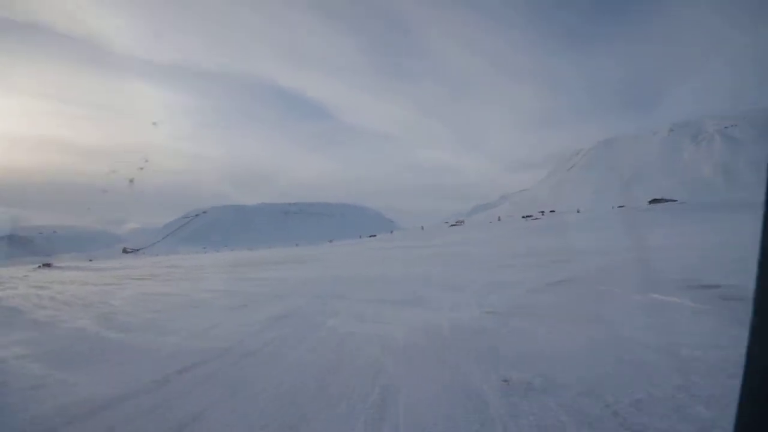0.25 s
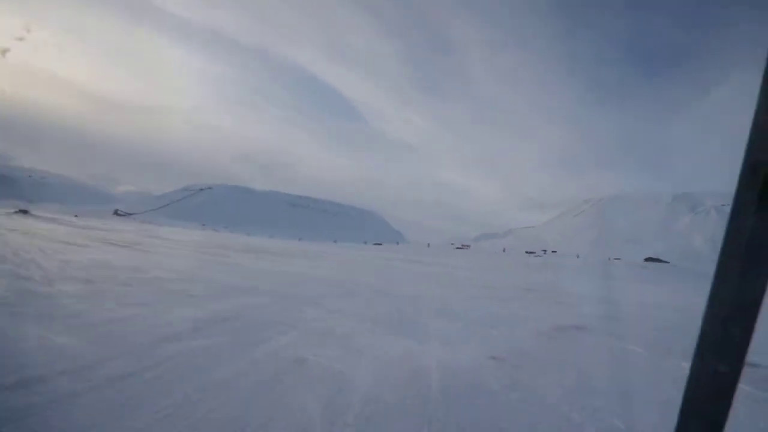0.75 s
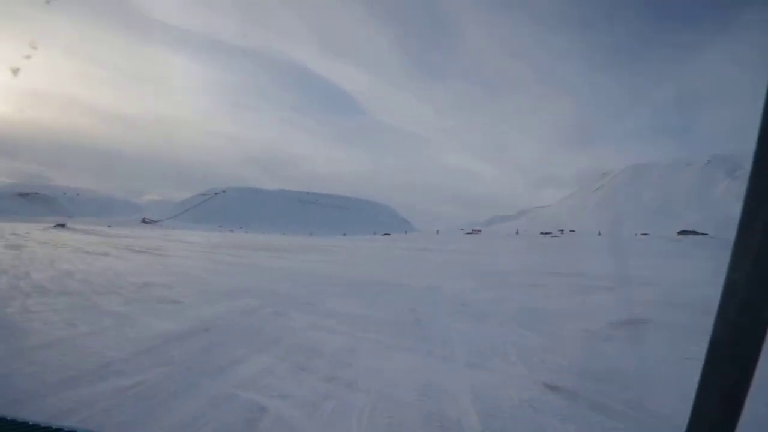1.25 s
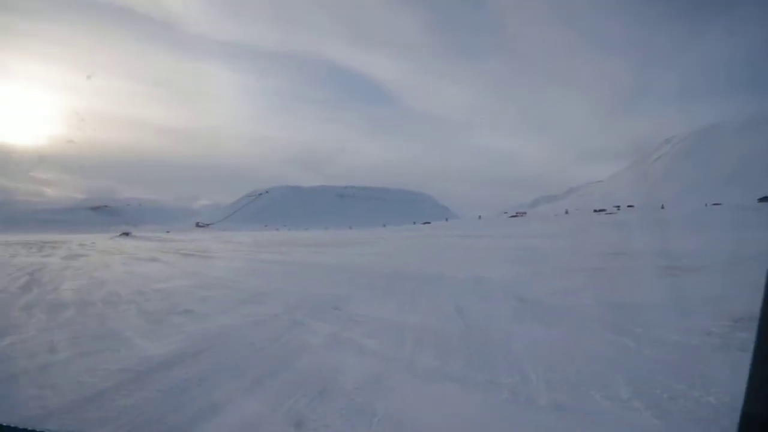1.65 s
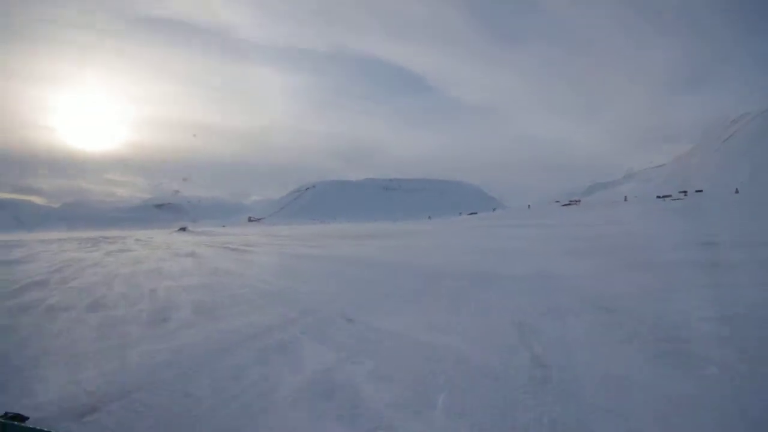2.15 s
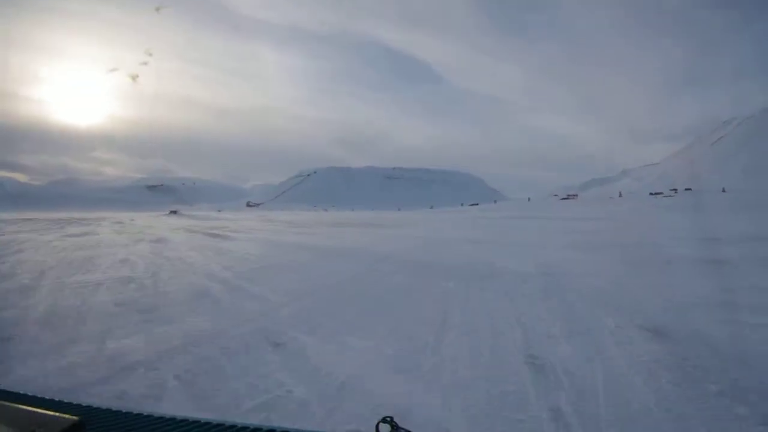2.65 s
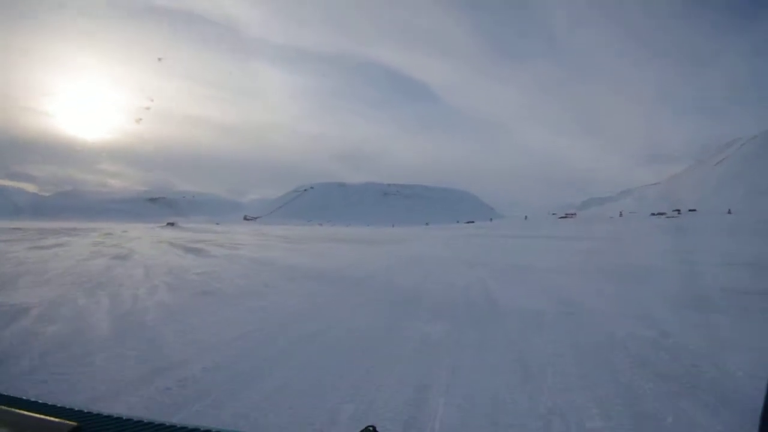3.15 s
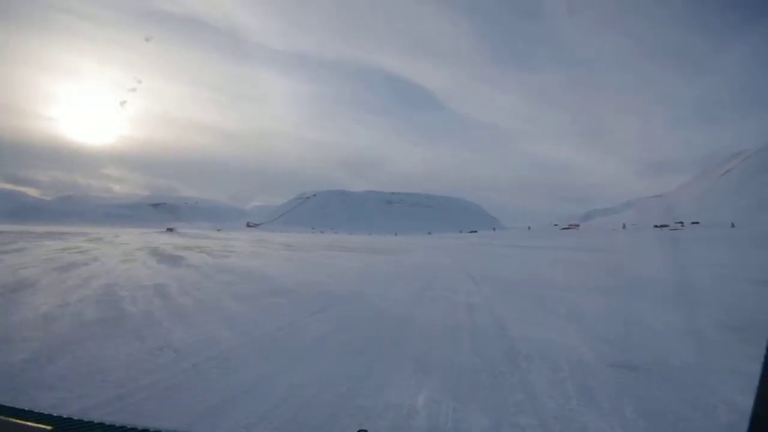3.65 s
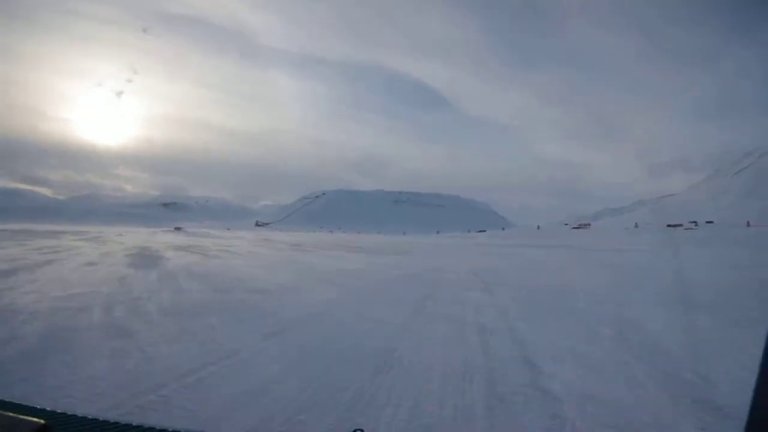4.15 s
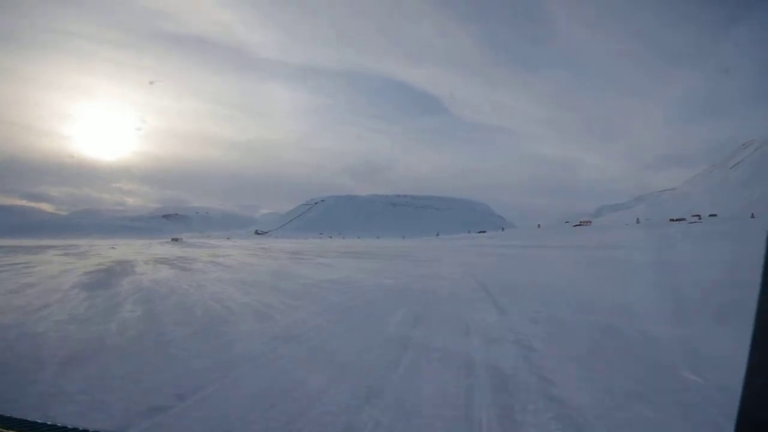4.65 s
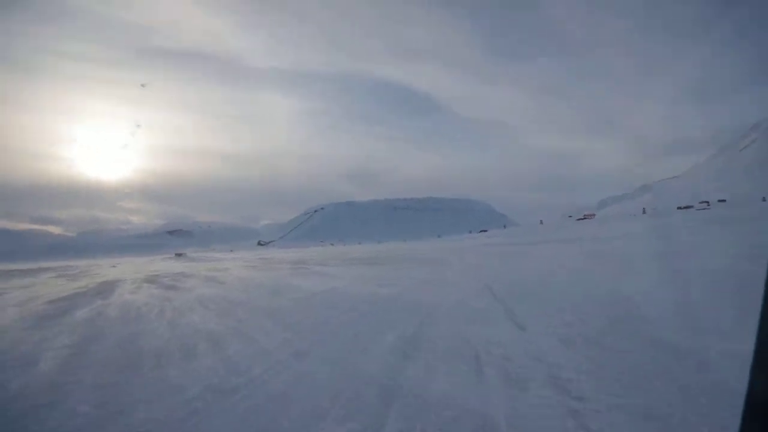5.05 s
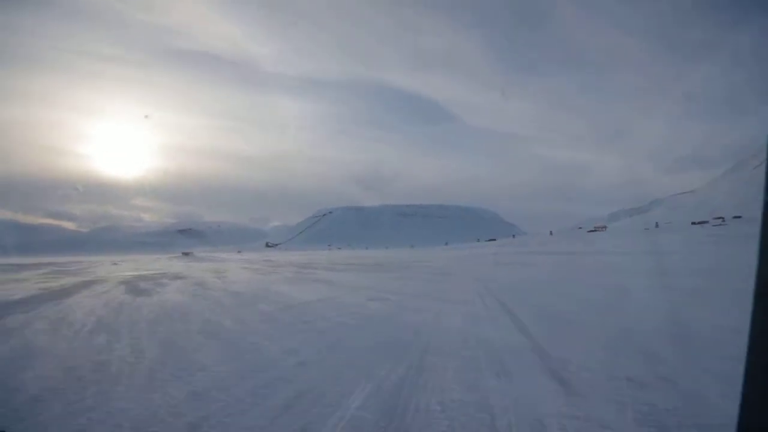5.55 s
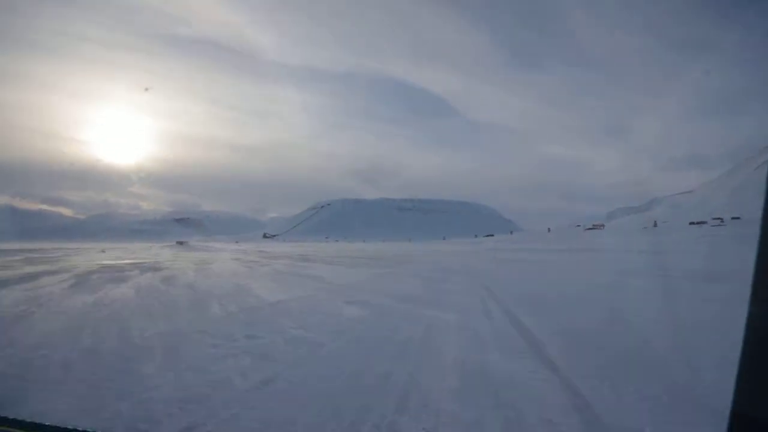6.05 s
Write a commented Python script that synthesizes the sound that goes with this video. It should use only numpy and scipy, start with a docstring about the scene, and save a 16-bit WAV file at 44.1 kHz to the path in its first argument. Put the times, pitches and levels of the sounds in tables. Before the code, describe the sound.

Heard from inside the cab, a tracked vehicle cruises over snow, its engine droning with a strong humming tone above rumbling, grinding tracks. Bumps swell the drone and bring dull thuds, hardest in the first half. The engine rises slightly in pitch, then eases back. Small ticks, pops and tiny squeaks run throughout, with faint puffs of hissing snow and a trace of jingling metal.

```python
"""Inside the cab of a tracked over-snow vehicle at cruise. From the start the engine hums, its ninth
cycle order booming, over rumbling tracks; ticks, pops and tiny squeaks run throughout, and the level dips
briefly at each tick or pop. At bumps the drone swells and the hull thuds, hardest from 1.2 to 3 s.
The engine speeds up slightly until 3 s, then eases back. Puffs of snow hiss against the cab, strongest
from 4.4 to 5.5 s, and loose metal jingles faintly with them."""
import sys
import numpy as np
from scipy import signal
from scipy.fft import rfft, irfft
from scipy.io import wavfile
from scipy.ndimage import uniform_filter1d

SR = 44100
rng = np.random.default_rng(int(sys.argv[2]) if len(sys.argv) > 2 else 0)


def transcribe(signal):
    """Save signal, clipped to [-1, 1], as a 16-bit WAV file at the path in sys.argv[1]."""
    frames = np.atleast_2d(signal).T
    limited = np.clip(frames, -1, 1)
    pcm = np.round(limited * 32767).astype(np.int16)
    wavfile.write(sys.argv[1], SR, pcm)


N = 277406
TIME = np.arange(N) / SR


def amp(db):
    """Decibels to gain."""
    return 10 ** (np.asarray(db) / 20)


def unit(x):
    """Scales to rms 1."""
    return x / np.sqrt(np.mean(x ** 2) + 1e-20)


def curve(table):
    """Breakpoints to one value a sample."""
    return np.interp(TIME, *np.transpose(table))


def add(mix, s, sound):
    """Mixes a sound in at time s."""
    part = mix[max(round(s * SR), 0):][:len(sound)]
    part += sound[:len(part)]


def noise(spectrum):
    """Shaped noise, rms 1."""
    hz, db = np.transpose(spectrum)
    gain = amp(np.interp(np.log(np.fft.rfftfreq(N, 1 / SR) + 1), np.log(hz), db))
    return unit(irfft(rfft(rng.standard_normal(N)) * gain, N))


def wander(rate_hz):
    """Smooth random motion up to rate_hz, rms 1."""
    hz = np.fft.rfftfreq(N, 1 / SR)
    return unit(irfft(rfft(rng.standard_normal(N)) / (1 + (hz / rate_hz) ** 4), N))


def hump(s, before_s, after_s):
    """Two-sided Gaussian swell at time s, height 1."""
    return np.exp(-((TIME - s) / np.where(TIME < s, before_s, after_s)) ** 2 / 2)


# Modes of small loose metal: f/Hz, relative level/dB, t60/s
METAL_MODES = [(11000, -7, .06), (11650, -7, .06), (12590, -3, .05), (13306, 4, .06), (14199, -11, .06),
               (14750, -7, .05), (15270, 9, .07), (15636, 11, 0.079)]

def jingle(gust_db, level_db=-9, spread_db=3, touches_per_s=100):
    """Random touches ring the metal's modes, harder in each gust."""
    t, out = np.arange(SR // 5) / SR, np.zeros(N)
    touching = rng.random(N) < touches_per_s / SR
    touches = touching * amp(gust_db + spread_db * rng.standard_normal(N))
    for hz, db, t60_s in METAL_MODES:
        ring = amp(db - 60 * t / t60_s) * np.sin(2 * np.pi * hz * t)
        out += signal.oaconvolve(touches * rng.standard_normal(N), ring)[:N]
    return unit(out) * np.sqrt(np.mean(amp(gust_db + level_db) ** 2))


# Snow puffs: peak t/s, relative level/dB, half-length/s
SNOW_PUFFS = [(0.09, -66, 0.016), (0.78, -66, 0.056), (1.783, -56.5, 0.046), (1.896, -57, 0.011),
              (2.01, -61, 0.029), (2.164, -72, 0.016), (2.367, -69, .025), (2.982, -60.5, 0.074),
              (3.264, -58, 0.035), (3.723, -63, .04), (4.376, -55.5, 0.02), (4.616, -51.5, .036),
              (4.915, -56, 0.0075), (5.012, -60, .015), (5.46, -58, 0.02), (5.532, -54, 0.021)]

def gusts(drift_db=-70, sway_db=3.5, sway_hz=5.4):
    """Flying snow in dB: puffs thrown by the tracks over a thin, uneven drift."""
    drift = amp(drift_db + sway_db * wander(sway_hz))
    puff_power = sum((amp(db) * hump(s, half_s, half_s)) ** 2 for s, db, half_s in SNOW_PUFFS)
    return 10 * np.log10(drift ** 2 + puff_power)


# Snow hiss: f/Hz, relative density/dB
SPRAY_SPECTRUM = [(1000, -7), (3000, -9), (6000, -7.5), (9000, -6), (12000, -5), (13800, -1.5), (15200, -1),
                  (16000, -1.5)]

def spray(gust_db, level_db=3.5, flicker_db=3, grit_db=2):
    """Fine snow hisses against the cab in gritty gusts."""
    return noise(SPRAY_SPECTRUM) * amp(gust_db + level_db + flicker_db * wander(37) + grit_db * wander(900))


# Tiny squeaks: t/s, relative peak level/dB, f/Hz
TRIM_SQUEAKS = [(0.1885, -35, 9050), (0.298, -46, 8040), (0.968, -40, 8400), (1.2204, -38, 8000),
                (2.9229, -33.5, 8200), (3.8852, -33, 9350), (3.9746, -40, 7840), (4.3251, -43, 8000),
                (4.7476, -36.5, 8550), (4.8434, -49, 8170), (5.1936, -37, 7900), (6.1444, -37.5, 8100),
                (6.2294, -44, 7540)]

def squeaks(level_db=3, rise_s=0.00013):
    """Chirps of a few cycles, as of dry trim catching."""
    t, out = np.arange(256) / SR, np.zeros(N)
    envelope = t / rise_s * np.exp(1 - t / rise_s)
    for s, db, hz in TRIM_SQUEAKS:
        add(out, s, amp(db + level_db) * envelope * np.sin(2 * np.pi * hz * t))
    return out


# Sharp ticks: t/s, step count
TICK_STAIRS = [(0.066, 5), (0.149, 3), (0.205, 4), (0.276, 4), (0.396, 3), (0.823, 5), (0.861, 3),
               (1.072, 3), (1.274, 4), (1.364, 2), (1.5, 4), (1.639, 5), (1.695, 6), (1.79, 3), (1.89, 3),
               (2.222, 2), (2.317, 3), (2.451, 5), (2.693, 3), (3.042, 4), (3.285, 5), (3.529, 5),
               (3.68, 3), (3.709, 4), (4.044, 6), (4.133, 6), (4.701, 3), (4.758, 4), (4.771, 6),
               (4.938, 4), (5.073, 4), (5.566, 4), (5.679, 4), (5.723, 5), (6.259, 3)]
# Dull pops: t/s, relative total height/dB
POP_STAIRS = [(0.3786, -15), (0.3873, -16), (0.5755, -17), (0.6707, -15), (0.7308, -15), (1.1078, -19),
              (1.1928, -18), (1.2445, -19), (1.4508, -18), (1.5452, -15.5), (1.8202, -17), (1.9874, -16),
              (2.0709, -16), (2.1689, -14), (2.177, -17), (2.2697, -16), (2.4317, -17), (2.782, -17),
              (2.8699, -19), (2.9273, -16), (2.9939, -17), (3.0148, -18), (3.044, -19), (3.1481, -18),
              (3.2185, -19), (3.4449, -17), (3.4826, -16.5), (3.5664, -17), (3.8603, -17), (4.2076, -15.5),
              (4.3375, -18), (4.481, -16), (5.0228, -16), (5.2037, -15), (5.2875, -15), (5.4022, -17),
              (5.8915, -19), (6.104, -16)]

def click_steps(tick_db=-32, tick_step_hz=2475, pop_gain_db=0.8, pop_step_hz=10160, pop_steps=5,
                small_db=-31.5, small_per_s=15, faint_db=-37, faint_per_s=41):
    """One impulse a step: slow stairs for ticks, steep for pops; random short stairs and lone steps."""
    steps = amp(faint_db) * rng.choice([-1, 1], N) * (rng.random(N) < faint_per_s / SR)
    small_times = TIME[rng.random(N) < small_per_s / SR]
    stairs = [(s, rng.choice([2, 2, 3]), tick_step_hz, amp(small_db)) for s in small_times]
    stairs += [(s, count, tick_step_hz, amp(tick_db)) for s, count in TICK_STAIRS]
    stairs += [(s, pop_steps, pop_step_hz, amp(db + pop_gain_db) / pop_steps) for s, db in POP_STAIRS]
    for s, count, step_hz, height in stairs:
        sign = rng.choice([-1, 1])
        for k in range(count):
            add(steps, s + k / step_hz, [sign * height])
    return steps


def ticks(steps, sag_hz=150, soften_hz=9500):
    """Each step is a sharp click that sags back; quick runs make ticks and pops."""
    jumps = signal.sosfilt(signal.butter(2, sag_hz, "high", fs=SR, output="sos"), np.cumsum(steps))
    return signal.sosfilt(signal.butter(2, soften_hz, fs=SR, output="sos"), jumps)


def dips(steps, dip_db=0.6364, full_step=0.032, recover_s=0.1, trend_s=0.19):
    """Gain that falls a little at each step and creeps back, centred on its local mean."""
    falls_db = dip_db * np.minimum(abs(steps) / full_step, 1)
    sunk_db = signal.lfilter([1], [1, -np.exp(-1 / (recover_s * SR))], falls_db)
    return amp(uniform_filter1d(sunk_db, int(trend_s * SR)) - sunk_db)


# Bumps: peak t/s, swell/dB, rise/s, thud level/dB, lull depth/dB (negative lifts)
BUMPS = [(0.386, 3, 0.16, -46, 0), (.565, -1, 0.017, -61, 1), (.675, 5, 0.032, -47, -4.5),
         (1.0, 4.5, 0.02, -53, -1), (1.195, 3.5, 0.058, -33, -2), (1.448, 3.5, 0.037, -31.5, 0.5),
         (1.825, 3.5, 0.048, -53, -1.5), (2.17, 2, 0.049, -32, -0.5), (2.425, 0, 0.079, -36, 0.5),
         (2.644, 3.5, 0.076, -28.5, 1.5), (3.01, 5.5, 0.12, -33.5, -0.5), (3.25, 4.5, 0.045, -48, 1.5),
         (3.56, -1.5, 0.036, -55, 1.5), (4.63, 3, 0.063, -52, .5), (4.76, 1.5, 0.039, -40, 1.5),
         (5.02, 1, 0.046, -52, 0.5), (5.205, 0.5, .04, -33.5, 0), (5.69, -0.5, 0.047, -50, 1),
         (5.89, 3, 0.064, -36.5, -1), (6.141, 4.5, 0.02, -52, 0.5)]

def bumps(drop_s=0.0063, lull_peak_s=0.046, thud_width_ratio=0.32):
    """At each bump the drone swells, then drops suddenly; a lull or slight lift follows."""
    swell_db, lull_db, thud_gain = np.zeros((3, N))
    for s, lift_db, rise_s, thud_db, depth_db in BUMPS:
        since = np.maximum(TIME - s, 0) / lull_peak_s
        swell_db += lift_db * hump(s, rise_s, drop_s)
        lull_db += depth_db * since * np.exp(1 - since)
        thud_gain += amp(thud_db) * hump(s, rise_s * thud_width_ratio, drop_s * thud_width_ratio)
    return swell_db, lull_db, thud_gain


# Hull response: f/Hz, relative density/dB
HULL_SPECTRUM = [(30, -50), (70, -28), (130, -5), (200, 3.5), (260, -2), (400, -7), (800, -22),
                 (2000, -32.5), (6000, -48), (14000, -56)]

def thuds(boom_hz, thud_gain, ring_db=-5):
    """The hull answers each bump with a dull thud; the cab's boom swells with it."""
    ring = np.sqrt(2) * np.cos(2 * np.pi * np.cumsum(boom_hz) / SR)
    return (noise(HULL_SPECTRUM) + amp(ring_db) * ring) * thud_gain


# Cab panel resonances: f/Hz, width/Hz, lift/dB
PANEL_MODES = [(558, 16, 8), (743, 10, 7), (870, 16, 6), (1117, 22, 13)]

def panels(hz):
    """Cab gain for a tone: panels sing when it drifts onto them."""
    return amp(sum(db / (1 + (2 * (hz - centre) / width) ** 2) for centre, width, db in PANEL_MODES))


# Cab rumble under the running gear: f/Hz, relative density/dB
RUMBLE_SPECTRUM = [(15, -44), (25, -27), (40, -24), (52, -15), (66, 2), (85, 9.5), (115, 13), (150, 9.5),
                   (220, -8), (300, 10.5), (450, -37)]
# Tracks on packed snow: f/Hz, relative density/dB
GRIND_SPECTRUM = [(30, -38), (60, 3), (150, 2), (290, 2), (360, -3), (500, -3), (575, 2.5), (700, -9),
                  (1200, -14.5), (2400, -23), (3800, -30), (6500, -41.5), (11000, -83), (16000, -57)]
# Track and final-drive tones at mean speed: f/Hz, relative level/dB
CLEAT_TONES = [(33.7, -15), (53.9, 1), (106.8, -1)]

def tracks(speed_ratio, grind_db, cleat_db, rumble_db=-41, flicker_db=1.5, waver=0.11, slip_hz=0.28):
    """Cleats beat at the pace of the drive, over a low rumble and the grind of snow."""
    out = noise(RUMBLE_SPECTRUM) * amp(rumble_db)
    out += noise(GRIND_SPECTRUM) * amp(grind_db + flicker_db * wander(47))
    for hz, db in CLEAT_TONES:
        phase = 2 * np.pi * np.cumsum(hz * speed_ratio + slip_hz * wander(4.5)) / SR
        tone = np.sqrt(2) * (1 + waver * wander(8.6)) * np.sin(phase)
        out += amp(cleat_db + db) * panels(hz * speed_ratio) * tone
    return out


# Engine orders: multiple of the four-stroke cycle rate, relative level/dB
CYCLE_ORDERS = [(3, -16.5), (4, -21), (5, -24), (6, -10), (7, -17.5), (9, 0), (11, -28), (13, -32),
                (14, -27), (15, -27), (16, -32), (18, -32), (21, -36), (24, -35), (28, -30.5), (29, -39),
                (32, -43), (33, -43), (36, -41), (46, -47), (50, -47)]

def engine(boom_hz, boom_db, boom_order=9, boom_waver=0.023, others_db=-32.5, others_waver=0.21,
           throb_hz=20.9, throb_depth=0.059):
    """Six-cylinder orders locked to the crankshaft; one booms in the cab, shaken by the running gear."""
    cycle_hz = boom_hz / boom_order
    cycle_phase = 2 * np.pi * np.cumsum(cycle_hz) / SR
    throb_phase = 2 * np.pi * np.cumsum(throb_hz * boom_hz / boom_hz.mean()) / SR
    boom_gain = amp(boom_db) * (1 + throb_depth * np.sin(throb_phase))
    others_gain = amp(others_db + boom_db - boom_db.mean())
    out = np.zeros(N)
    for order, db in CYCLE_ORDERS:
        gain, waver = (boom_gain, boom_waver) if order == boom_order else (others_gain, others_waver)
        phase = order * cycle_phase + 2 * np.pi * rng.random() * (order != boom_order)
        tone = (1 + waver * wander(11.7)) * np.cos(phase) + waver * wander(12) * np.sin(phase)
        out += gain * amp(db) * panels(order * cycle_hz) * np.sqrt(2) * tone
    return out


# Engine speed as boom pitch: t/s, f/Hz
BOOM_PITCH = [(0, 278.4), (.6, 277.3), (1.05, 279.8), (1.3, 279.4), (1.5, 281.2), (2, 281.8), (3, 289.6),
              (3.45, 288.8), (4, 284.8), (4.45, 285.2), (4.9, 281.5), (5.2, 281), (5.6, 279.4),
              (6.29, 278.8)]
# Engine load as base boom strength: t/s, level/dB
ENGINE_LOAD = [(0, -34), (.75, -34.5), (1.1, -32.5), (1.6, -35), (2.3, -30.5), (2.8, -29), (3.2, -31.5),
               (3.45, -32.5), (4, -32), (4.5, -32.5), (5.25, -28), (5.7, -31.5), (6.29, -33)]

def scene():
    """Engine and tracks follow load and swells; drone and treble dip, ticks and squeaks ride on top."""
    boom_hz, load_db = curve(BOOM_PITCH), curve(ENGINE_LOAD)
    swell_db, lull_db, thud_gain = bumps()
    strain_db = load_db - load_db.mean()
    boom_db = load_db + 1.08 * swell_db - lull_db
    grind_db = -40.5 + 0.47 * strain_db + swell_db - 0.8 * lull_db
    cleat_db = -45.5 - 0.23 * strain_db - 1.6 * swell_db  # weaker under load and in swells
    gust_db = gusts() - lull_db
    steps = click_steps()
    gear = tracks(boom_hz / boom_hz.mean(), grind_db, cleat_db)
    drone = thuds(boom_hz, thud_gain) + gear + engine(boom_hz, boom_db)
    treble = jingle(gust_db) + spray(gust_db)
    return ((drone + treble) * dips(steps) + ticks(steps) + squeaks())[None]


def record(dry, low_cut_hz=36, edge_hz=15850):
    """Low cut and steep band limit."""
    trimmed = signal.sosfilt(signal.butter(2, low_cut_hz, "high", fs=SR, output="sos"), dry)
    lowpass = signal.firwin(511, edge_hz, window=("kaiser", 9), fs=SR)
    return signal.oaconvolve(trimmed, lowpass[None], "same")


dry = scene()
out = record(dry)
transcribe(out)
```